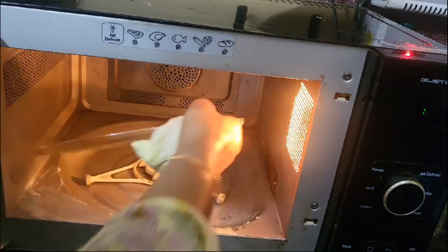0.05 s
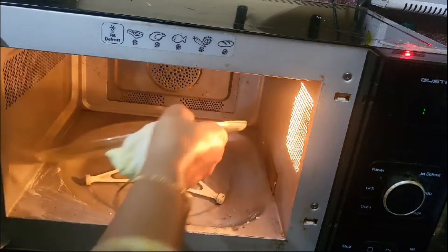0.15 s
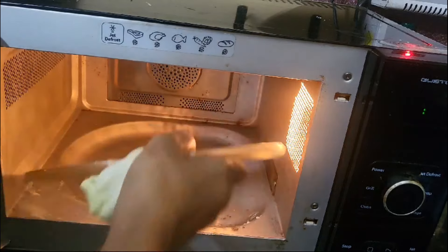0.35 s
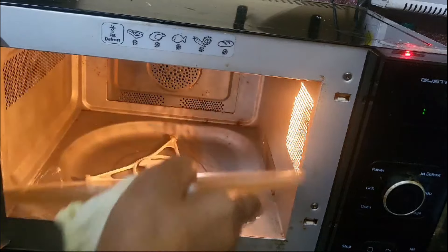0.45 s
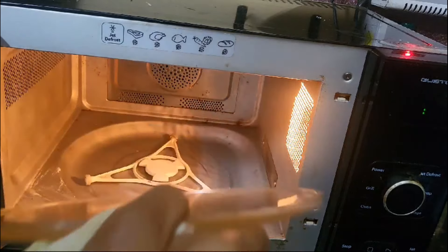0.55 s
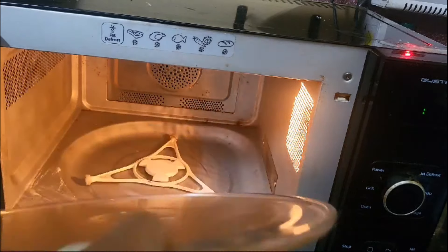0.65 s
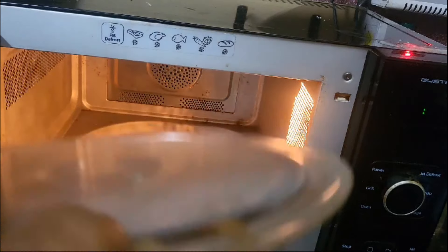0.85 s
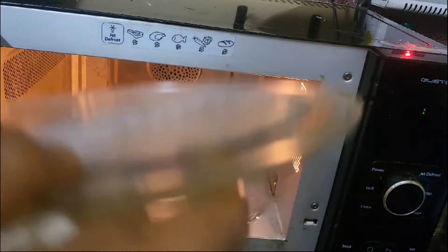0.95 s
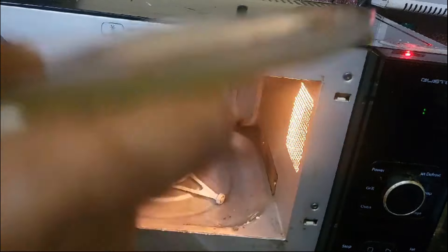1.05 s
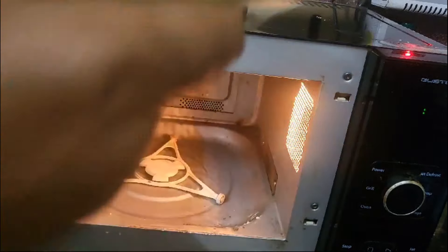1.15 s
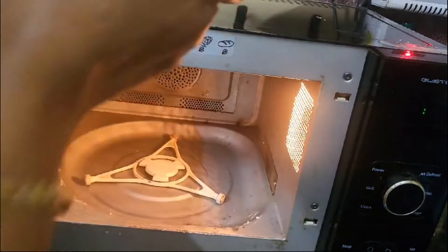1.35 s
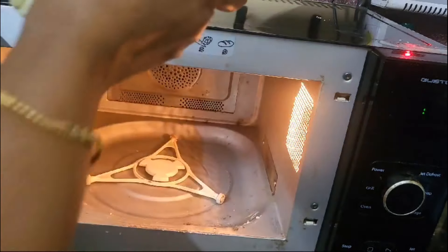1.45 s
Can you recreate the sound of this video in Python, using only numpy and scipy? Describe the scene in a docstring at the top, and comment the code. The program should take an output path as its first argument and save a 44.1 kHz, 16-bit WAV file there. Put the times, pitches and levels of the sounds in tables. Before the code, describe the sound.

A glass plate clunks as it is lifted out of a microwave oven. At first it rumbles on its rollers and scrapes the metal, then strikes loudly at about 0.2 seconds, the glass clinking and the steel box briefly booming. Soft bumps follow until 0.55 seconds. Faint, thin squeaks of cloth on glass come around 0.6 and 1.1 seconds. A faint kitchen hum lasts throughout.

```python
"""A faint hum hangs in a quiet kitchen as a glass plate is lifted out of a microwave oven.
The plate rumbles off its rollers, then scrapes the metal in many tiny slips that set the glass ringing.
It hits the oven with one loud clunk among lighter touches: the glass clinks and the steel box booms.
A few soft bumps follow, and last come thin squeaks of a cloth slipping on the glass."""
import sys
import numpy as np
from scipy import signal
from scipy.io import wavfile

SR = 44100
rng = np.random.default_rng(int(sys.argv[2]) if len(sys.argv) > 2 else 0)


def master_out(mix):
    """Clip the mix to full scale and print it as 16-bit PCM to the path in sys.argv[1]."""
    frames = np.transpose(np.atleast_2d(mix))
    ceiling = np.clip(frames, -1, 1)
    pcm = np.round(ceiling * 32767).astype(np.int16)
    wavfile.write(sys.argv[1], SR, pcm)


N = 66150
T = np.arange(N) / SR

# each time glass strikes steel: start_s, thud_db, clatter_db, snap_db
CONTACTS = [(0.0, -23, -25.5, -60), (0.01, -23, -29.5, -60), (0.119, -34.5, -39.5, -50),
            (0.2132, 2.5, 1.5, 5.5), (0.2198, -18.5, -3, -22), (0.228, -45, -9.5, -7.5),
            (0.259, -14.5, -13.5, -38)]
# how sound reaches the two ears: pitch_hz, likeness (1 = the same in both), left_minus_right_db
STEREO = [(50, 1, 9), (150, 0.94, -2), (330, 0.88, 1.9), (600, 0.53, -2), (1200, 0, .5), (2800, 0.18, 1.5),
          (12000, 0, 4)]


def from_db(db):
    """Turn decibels into a number to multiply by."""
    return 10 ** (np.asarray(db) / 20)


def rms_one(x):
    """Scale a signal so its average power is 1."""
    return x / np.sqrt(np.mean(x ** 2) + 1e-20)


def in_time(rows):
    """Join (time_s, level_db) points into a volume for every sample."""
    return from_db(np.interp(T, *np.transpose(rows)))


def at_hz(rows, hz):
    """Read a table's other columns at one pitch."""
    pitches, *columns = np.transpose(rows)
    return [np.interp(np.log(hz), np.log(pitches), column) for column in columns]


def fade(fade_s):
    """Die away by 60 dB in fade_s seconds."""
    return np.exp(-np.log(1000) * T / fade_s)


def drift(rate_hz):
    """A slow random wobble, about 1 in size."""
    memory = np.exp(-2 * np.pi * rate_hz / SR)
    wobble = signal.lfilter([1], [1, -2 * memory, memory * memory], rng.standard_normal(2 * N))
    return rms_one(wobble[N:])


def high_pass(x, hz):
    """Turn down everything lower than hz."""
    return signal.sosfilt(signal.butter(2, hz, "high", fs=SR, output="sos"), x)


def excite(force, response):
    """Start a copy of a stereo sound at every push in the force."""
    return signal.fftconvolve(force[None], response, axes=1)[:, :N]


def clicks(times, db):
    """One sharp push for each touch."""
    out = np.zeros(N)
    np.add.at(out, np.clip(times * SR, 0, N - 1).astype(int), from_db(db))
    return out


def pan(hz):
    """Left and right volume at one pitch."""
    return from_db(at_hz(STEREO, hz)[1] * np.array([[.5], [-.5]]))


def noise_bands():
    """Stereo noise in half-octave slices, low to high, each with its middle pitch."""
    edges_hz = 22 * 2 ** np.arange(0, 9.6, .5)
    for low, high in zip(edges_hz, edges_hz[1:]):
        band_filter = signal.butter(2, [low, high], "band", fs=SR, output="sos")
        noise = rng.standard_normal((2, N + SR // 2))
        shared, side = signal.sosfilt(np.vstack([band_filter, band_filter]), noise)[:, -N:]
        hz = np.sqrt(low * high)
        alike = np.clip(at_hz(STEREO, hz)[0], -1, 1)
        both_ears = np.sqrt(1 + alike) * shared + np.sqrt(1 - alike) * side * [[1], [-1]]
        yield hz, pan(hz) * rms_one(both_ears)


def coloured_noise(colour, flicker_db):
    """Noise with a chosen mix of lows and highs, each slice flickering on its own."""
    out = 0
    for hz, band in noise_bands():
        level_db = at_hz(colour, hz)[0] + flicker_db * drift(5.7)
        out = out + band * np.sqrt(hz) * from_db(level_db)
    return rms_one(out)


def kitchen(room_db=-53.5, waver_db=-3):
    """Soft room noise and a wavering hum last the whole time."""
    # the tones of the hum: pitch_hz, level_db
    hum_tones = [(306.8, -70), (430.7, -64.5)]
    # lows and highs of the room noise: pitch_hz, relative_level_db
    room_colour = [(15, -76), (25, -53.5), (75, -21), (133, -13), (198, -1), (233, -12), (289, -2.5),
                   (421, -5.5), (598, -13.5), (648, -9), (1340, -19), (1490, -20.5), (1850, -21.5),
                   (3440, -41.5), (15500, -43.5)]
    hum = 0
    for hz, db in hum_tones:
        waver = from_db(waver_db * drift(5.4))
        tone = np.sin(2 * np.pi * hz * T + drift(3))
        hum = hum + from_db(db) * rms_one(waver * tone)
    return from_db(room_db) * coloured_noise(room_colour, flicker_db=1.56) + hum


def rollers():
    """The roller ring rumbles unevenly under the moving plate until the plate is clear."""
    # loudness of the rumble: time_s, level_db
    roll_levels = [(0, -32.5), (.035, -35.5), (.1, -40), (.15, -35.5), (.22, -38), (.4, -44), (.6, -53.5),
                   (.8, -70.5)]
    # lows and highs of the rumble: pitch_hz, relative_level_db
    roll_colour = [(30, -15), (80, -15), (140, 1.5), (190, -6), (400, -1), (750, -6.5), (1100, -15),
                   (3000, -28), (9000, -46)]
    return in_time(roll_levels) * coloured_noise(roll_colour, flicker_db=-1.5)


def scrape(slips_per_s=910, slip_db=-22, scatter_db=5.5):
    """Glass sliding on metal slips many times at random; this gives the tiny pushes on the plate."""
    # how hard the glass presses on the metal: time_s, relative_level_db
    pressure = [(0, -35), (.06, -30), (.12, -16), (.153, -21), (.158, -2.5), (.172, -0.5), (.208, 6),
                (.218, -63), (.26, -51.5)]
    slips = (rng.random(N) < slips_per_s / SR) * rng.choice([-1, 1], N)
    strength = from_db(slip_db + scatter_db * rng.standard_normal(N))
    keep_highs = signal.butter(1, [1200, 11850], "band", fs=SR, output="sos")
    return signal.sosfilt(keep_highs, slips * strength * in_time(pressure))


def clink(glass_db=-34, crack_fade_s=0.12, rise_s=0.0028):
    """One touch of glass on metal: a crack, a tail of clatter and the plate's own ringing notes."""
    # dense clatter inside the box: pitch_hz, crack_db, tail_db, tail_fade_s
    clatter = [(40, -51, -66.5, 1), (104.8, -53, -49.5, 0.37), (260, -45, -49, 0.35),
               (452, -17, -34.5, .55), (750, -35, -31.5, 0.45), (1400, -34.5, -34.5, .42),
               (2660, -25, -40.5, 0.45), (5640, -32.5, -50, 0.5), (9000, -39.5, -61, 0.82),
               (15000, -45.5, -55.5, .36)]
    # notes of the glass plate: pitch_hz, relative_level_db, fade_s
    glass_notes = [(1193, 0, .24), (1440, -8, .25), (1577, -7, .24), (1922, 1, .27), (2257, -3, .26),
                   (2380, -4, .28), (2746, -6, .26), (3085, -7, .13), (3413, -8, .15), (4037, -10, .16)]
    out = 0
    for hz, band in noise_bands():
        crack_db, tail_db, fade_s = at_hz(clatter, hz)
        out = out + band * (from_db(crack_db) * fade(crack_fade_s) + from_db(tail_db) * fade(fade_s))
    for hz, db, fade_s in glass_notes:
        tone = np.sin(2 * np.pi * (hz * T + rng.random((2, 1))))
        out = out + pan(hz) * from_db(glass_db + db) * fade(fade_s) * tone
    return out * (1 - np.exp(-T / rise_s))


def plate(snap_gain_db=-31, snap_low_hz=3400, slip_snap_db=-0.5):
    """Every slip and every strike gives a bright snap and sets the glass clinking."""
    start_s, _, clatter_db, snap_db = np.transpose(CONTACTS)
    slips = scrape()
    burst = rng.standard_normal((2, N)) * fade(fade_s=0.065)
    snap = from_db(snap_gain_db) * pan(snap_low_hz) * high_pass(burst, snap_low_hz)
    clinks = excite(clicks(start_s, clatter_db) + slips, clink())
    snaps = excite(clicks(start_s, snap_db) + from_db(slip_snap_db) * slips, snap)
    return clinks + snaps


def box(boom_fade_s=0.089, rise_s=.004, scatter_db=0.4, stereo_spread=.22, fall_db_per_octave=16.5):
    """Each strike or bump makes the oven's steel walls boom briefly and leaves them ringing."""
    # notes of the steel box: pitch_hz
    box_pitches = [70.5, 145, 161, 238, 289, 332, 372, 465, 522, 565, 660, 742, 828, 1010, 1120]
    # how each of those notes sounds: boom_db, ring_db, ring_fade_s
    box_notes = [(-44.5, -41, 1.0), (-33, -46, 0.86), (-39, -48, 1), (-12.5, -47, .4), (-10.5, -30.5, 0.72),
                 (-11, -34, 0.27), (-27.5, -39, 0.61), (-12, -35, 0.91), (-38.5, -33.5, .35),
                 (-16, -41.5, 0.61), (-20, -30, 0.49), (-8, -34.5, 0.72), (-39, -37.5, 0.39),
                 (-24, -49, .42), (-27, -48.5, 0.71)]
    # soft bumps that move only the box: start_s, level_db, strongest_pitch_hz
    bumps = [(0.029, -8, 159), (0.063, -17, 487), (0.135, -8.5, 457), (0.146, -8.5, 405),
             (0.334, -11.5, 344), (0.361, -17, 312), (0.432, -22, 302), (0.452, -28, 303),
             (0.485, -21.5, 287), (0.547, -24.5, 290)]
    hit_s, hit_db, _, _ = np.transpose(CONTACTS)
    bump_s, bump_db, bump_hz = np.transpose(bumps)
    out = 0
    for k, (hz, (boom_db, ring_db, fade_s)) in enumerate(zip(box_pitches, box_notes)):
        angle = 2 * np.pi * hz * T
        direction = (-1) ** k   # neighbouring notes start in opposite directions
        boom = direction * from_db(boom_db) * fade(boom_fade_s) * np.cos(angle)
        side = stereo_spread * direction * np.sin(angle) * [[1], [-1]]
        ring = from_db(ring_db) * fade(fade_s) * (np.cos(angle) + side)
        note = (boom + ring) * (1 - np.exp(-T / rise_s))
        octaves_away = np.abs(np.log2(hz / bump_hz))
        db = np.r_[hit_db, bump_db - fall_db_per_octave * octaves_away]
        force = clicks(np.r_[hit_s, bump_s], db + scatter_db * rng.standard_normal(len(db)))
        out = out + pan(hz) * high_pass(excite(force, note), hz / 2)
    return out


def squeak():
    """Cloth slips on the glass: rubbing noise around a few pitches swells, holds and dies away."""
    # each rub: start_s, rise_s, hold_s, fade_s, list of (pitch_hz, width_hz, level_db)
    rubs = [(0.538, 0.014, 0.12, 0.48, [(2550, 440, -64.5), (3990, 910, -65), (7300, 1300, -73.5),
            (11700, 5100, -71)]), (.585, 0.019, 0.06, 0.53, [(4870, 180, -59.5), (5360, 450, -67)]),
            (1.09, 0.073, 0.041, 1, [(2590, 890, -73.5), (6300, 6000, -69.5), (10500, 2000, -81)]),
            (1.13, 0.058, .1, 1.0, [(3040, 86, -68.5), (3466, 210, -67.5)])]
    out = 0
    for start_s, rise_s, hold_s, fade_s, pitches in rubs:
        age_s = T - start_s
        swell = np.clip(age_s / rise_s, 0, 1)
        dying = np.exp(-np.log(1000) * np.maximum(age_s - rise_s - hold_s, 0) / fade_s)
        for hz, width_hz, db in pitches:
            peak = signal.iirpeak(hz, hz / width_hz, fs=SR)
            noise = rng.standard_normal((2, N))
            rubbing = signal.lfilter(*peak, signal.lfilter(*peak, noise))
            out = out + swell * dying * pan(hz) * from_db(db) * rms_one(rubbing)
    return out


def scene():
    """Oven, plate, cloth and room together."""
    return box() + plate() + rollers() + squeak() + kitchen()


def record(dry, low_cut_hz=31, top_cut_hz=15750):
    """Drop the deepest bass, stop peaks at full volume and cut the very highest sounds."""
    limited = np.clip(high_pass(dry, low_cut_hz), -1, 1)
    return signal.sosfilt(signal.ellip(12, .1, 80, top_cut_hz, fs=SR, output="sos"), limited)


dry = scene()
out = record(dry)
master_out(out)
```